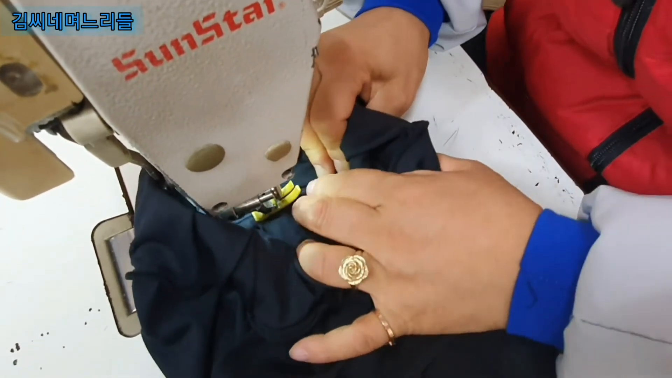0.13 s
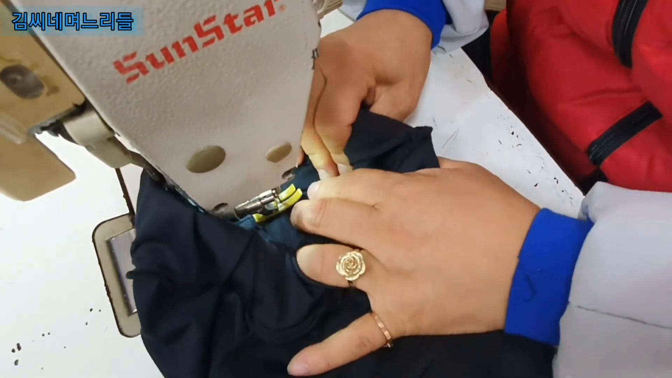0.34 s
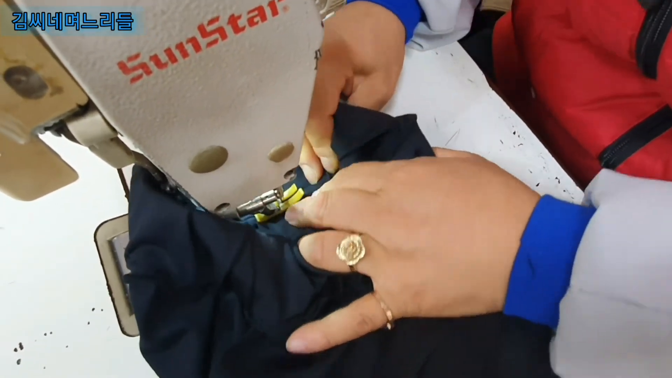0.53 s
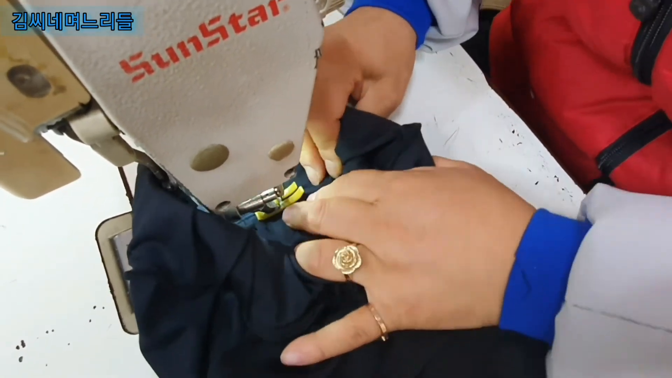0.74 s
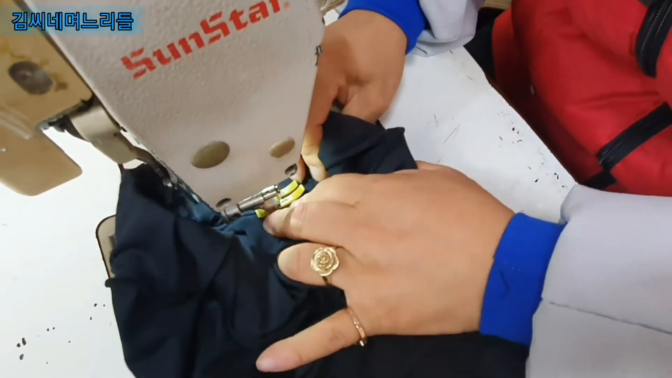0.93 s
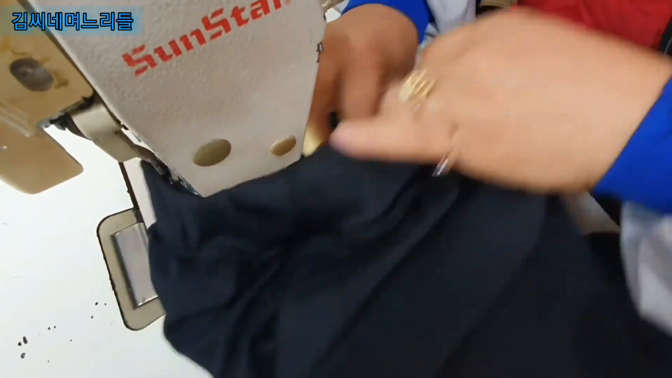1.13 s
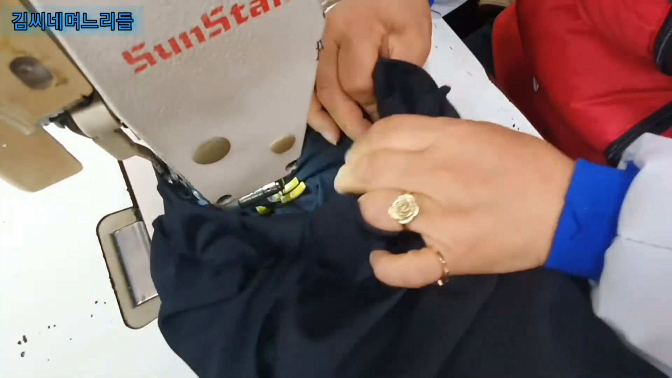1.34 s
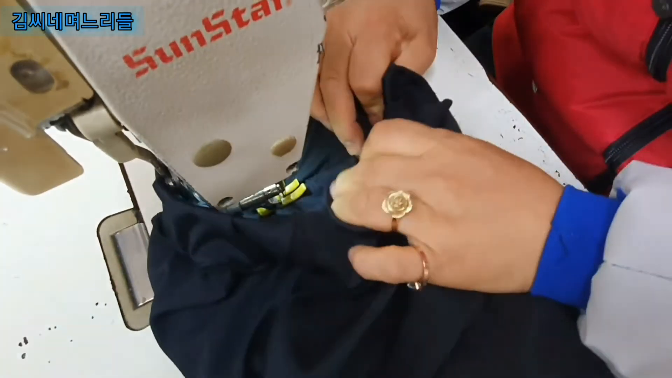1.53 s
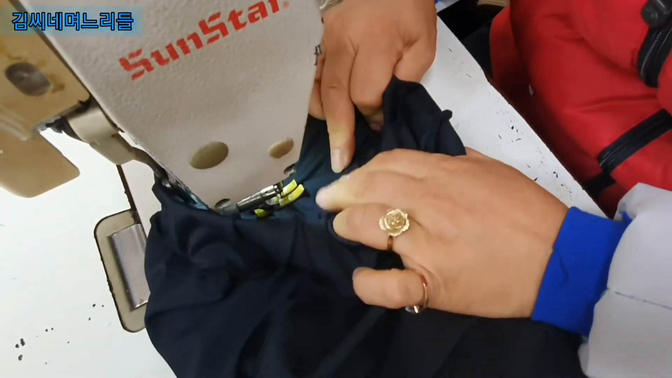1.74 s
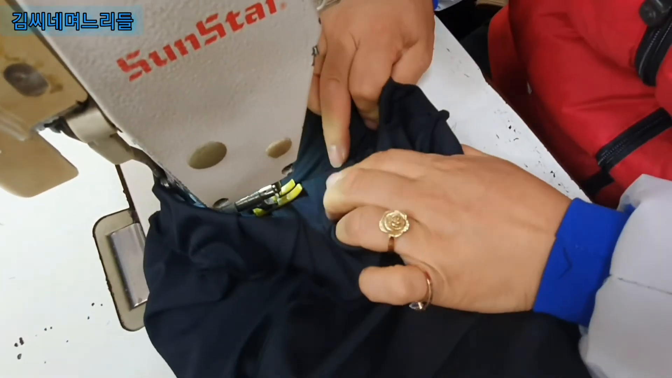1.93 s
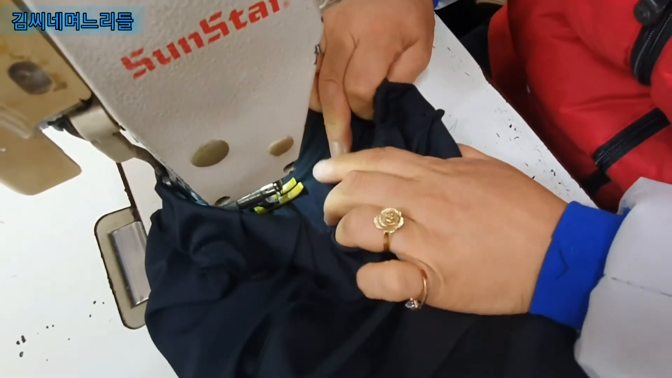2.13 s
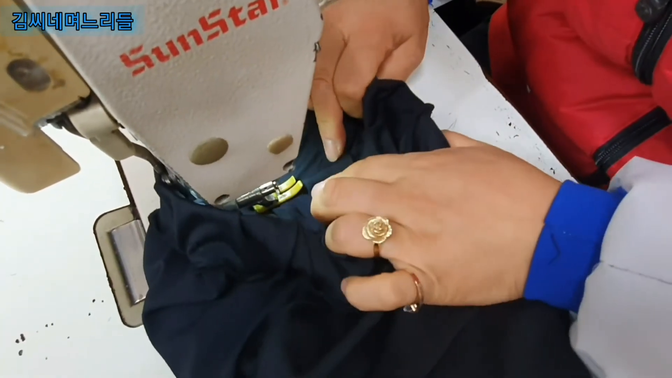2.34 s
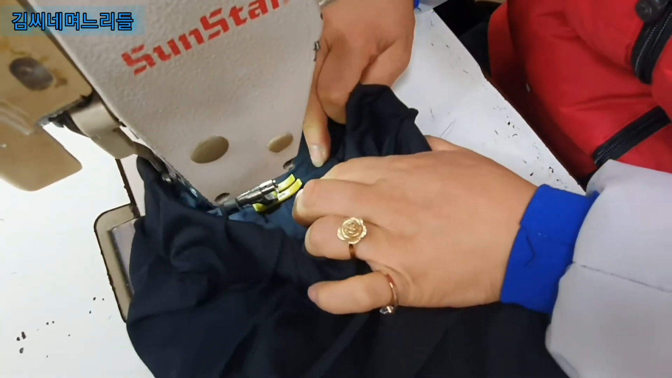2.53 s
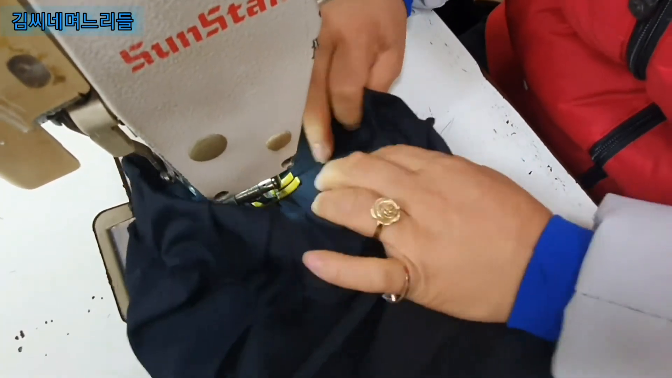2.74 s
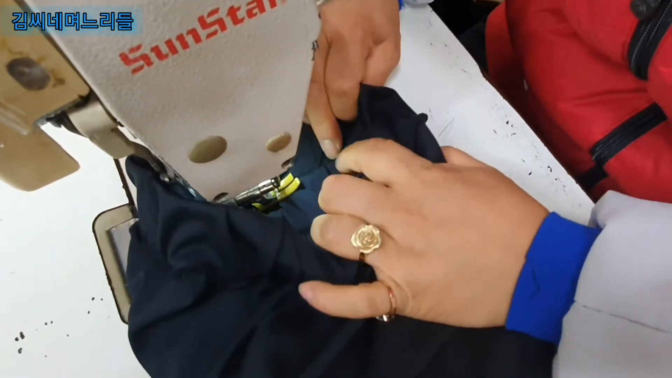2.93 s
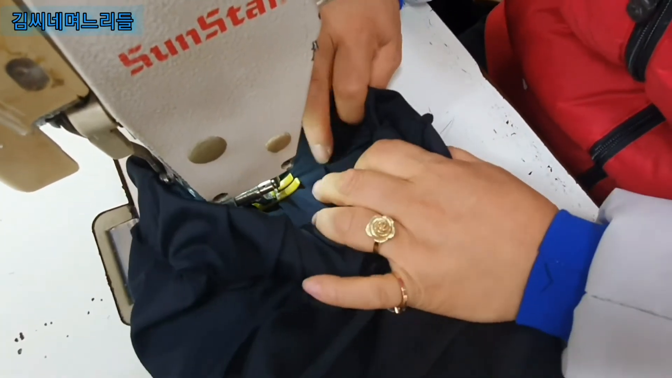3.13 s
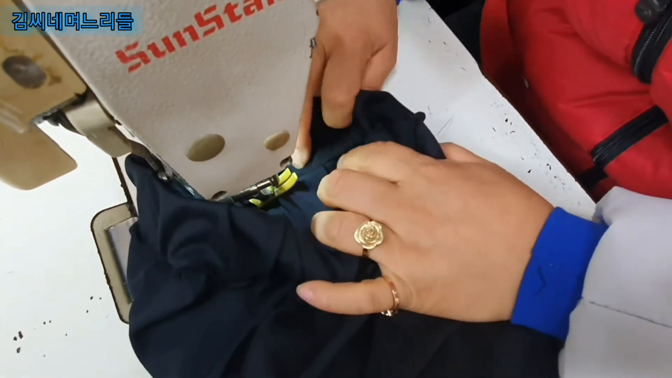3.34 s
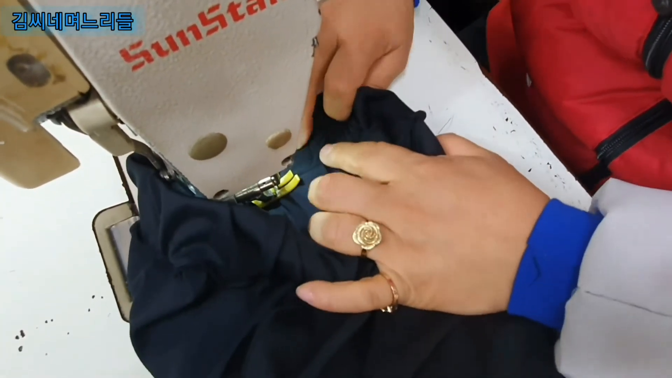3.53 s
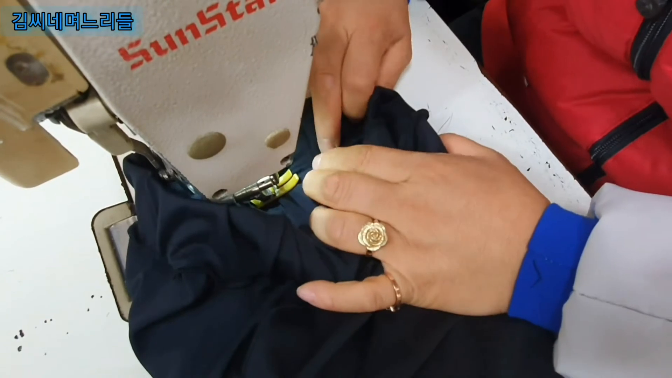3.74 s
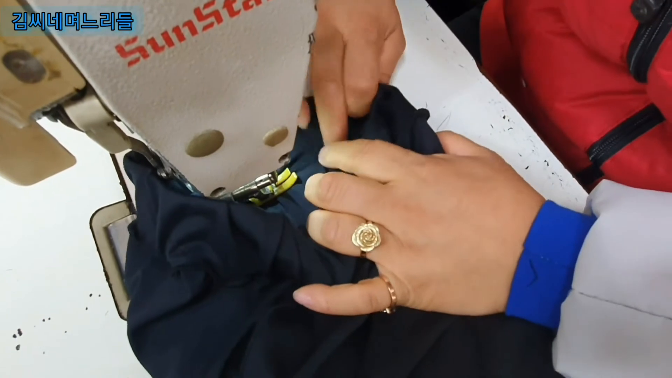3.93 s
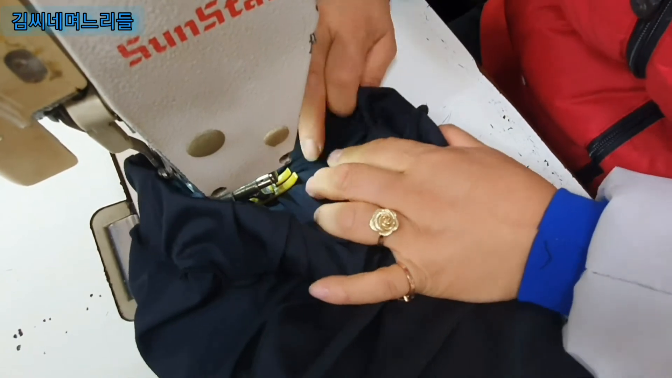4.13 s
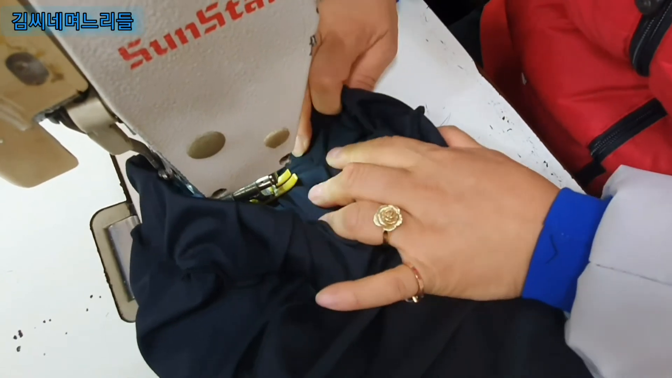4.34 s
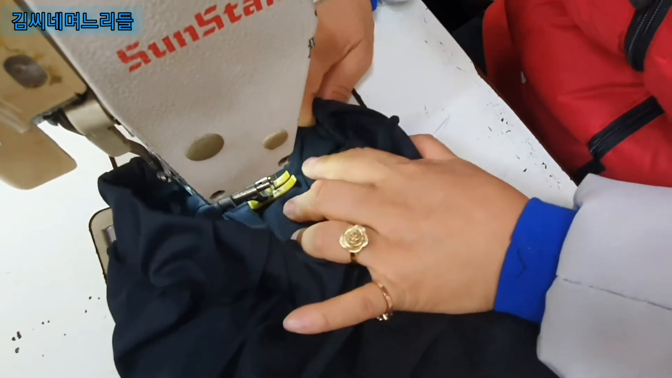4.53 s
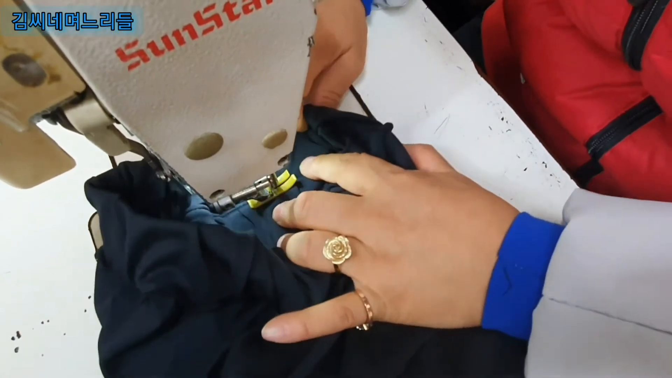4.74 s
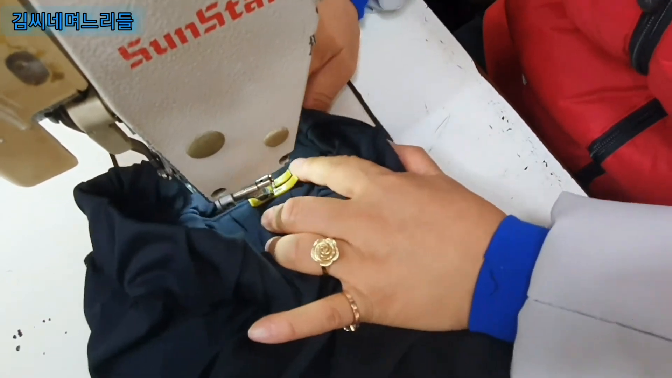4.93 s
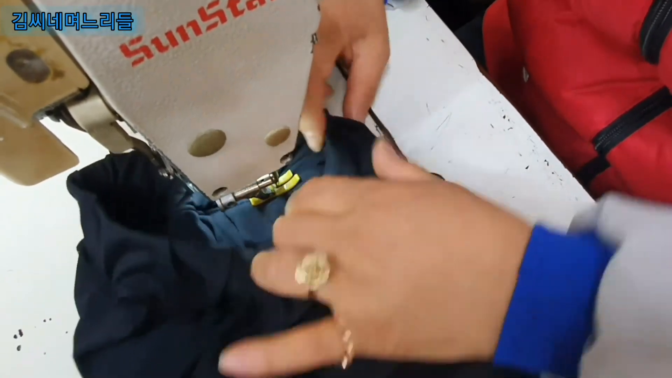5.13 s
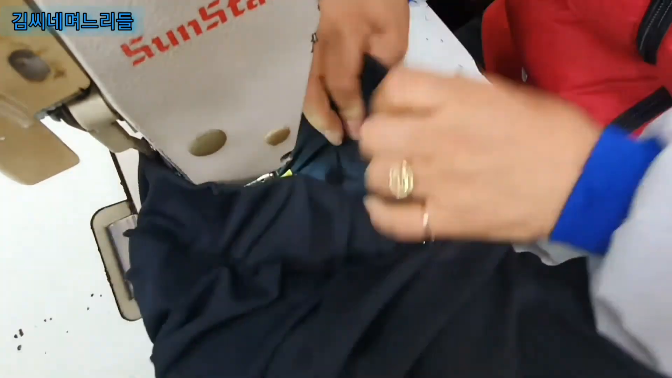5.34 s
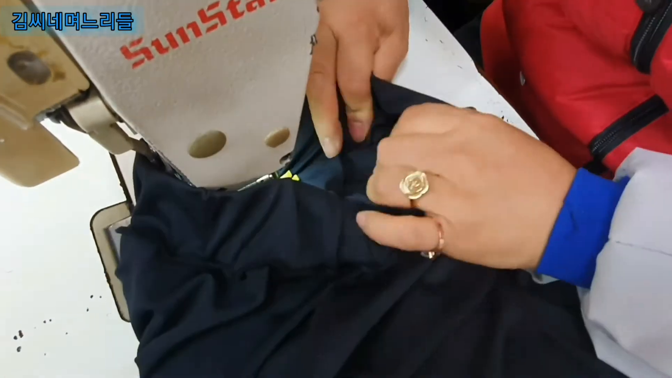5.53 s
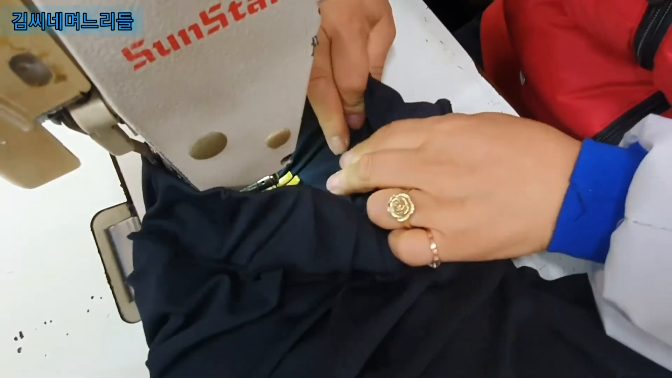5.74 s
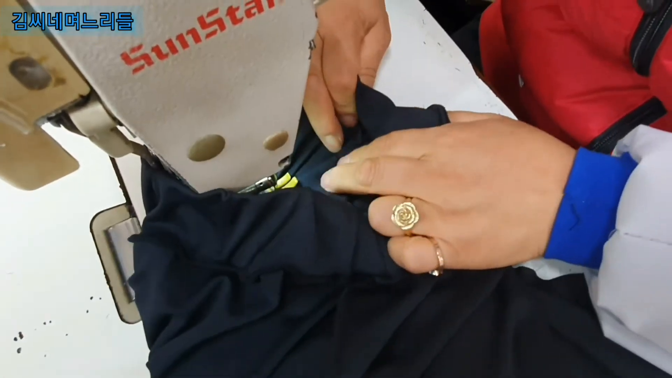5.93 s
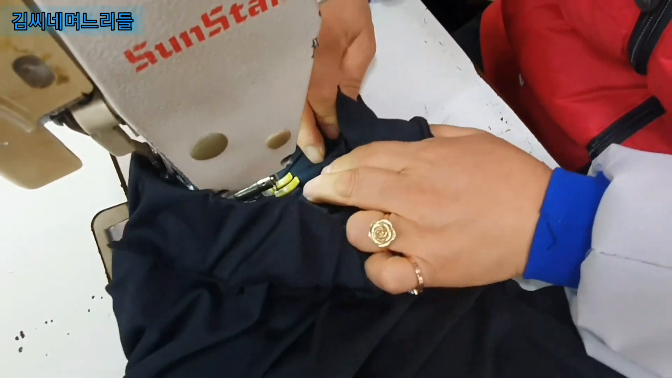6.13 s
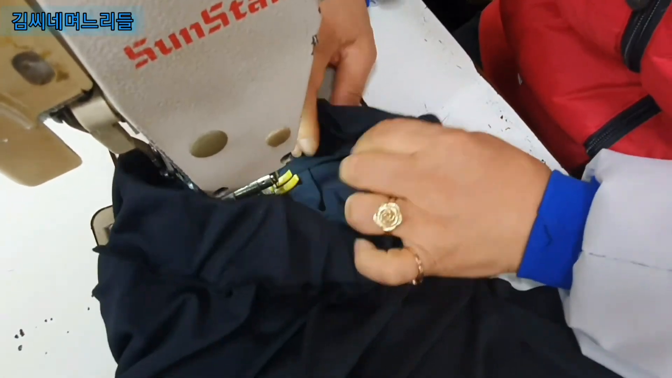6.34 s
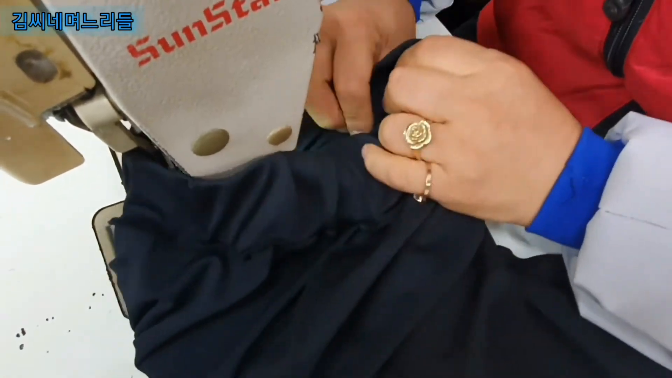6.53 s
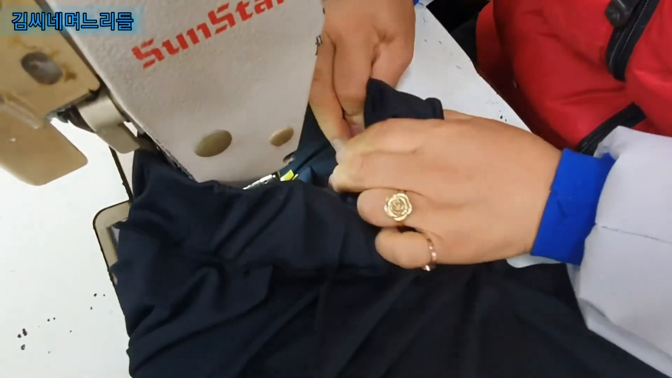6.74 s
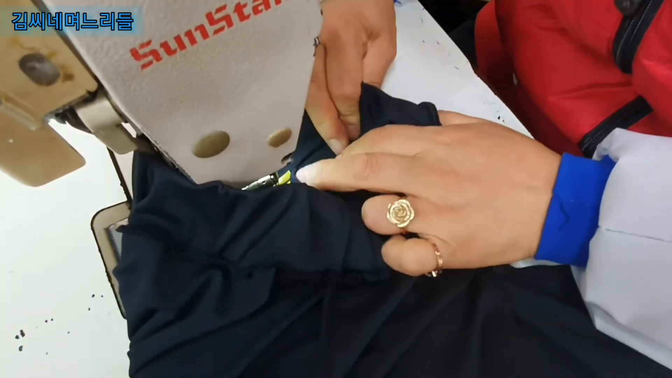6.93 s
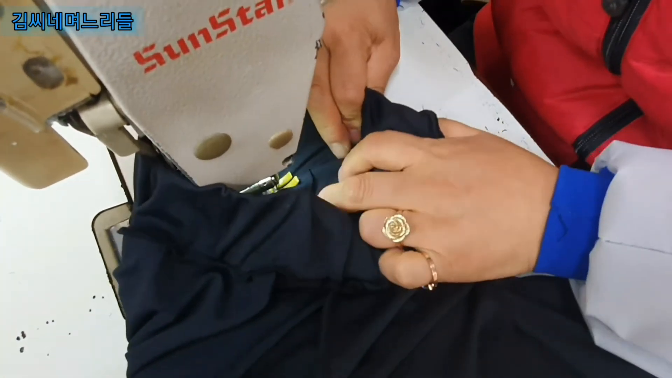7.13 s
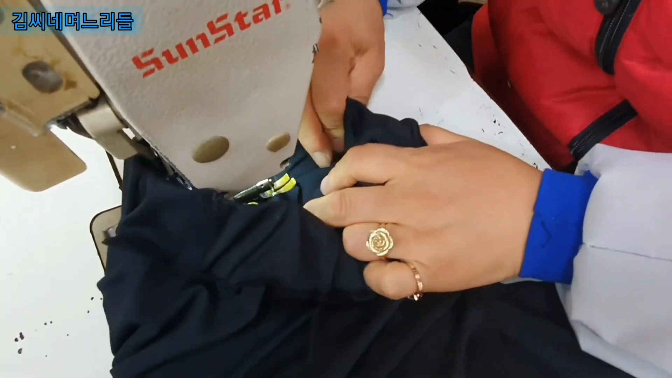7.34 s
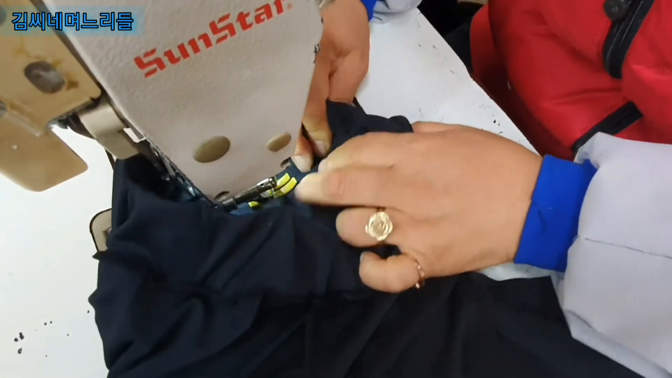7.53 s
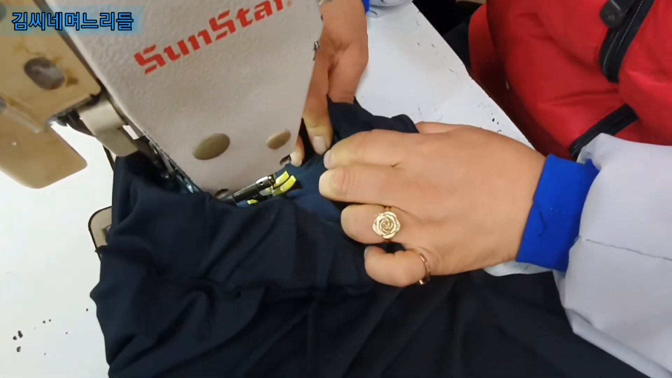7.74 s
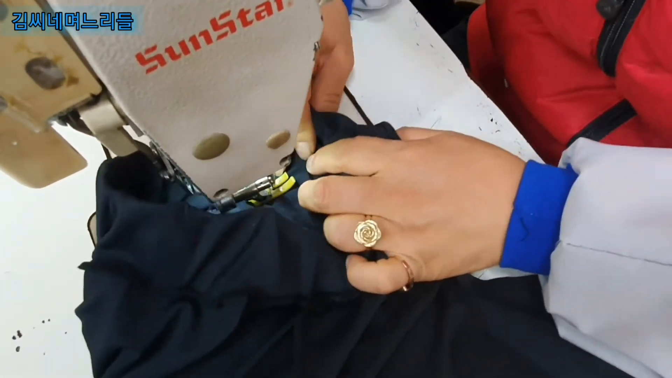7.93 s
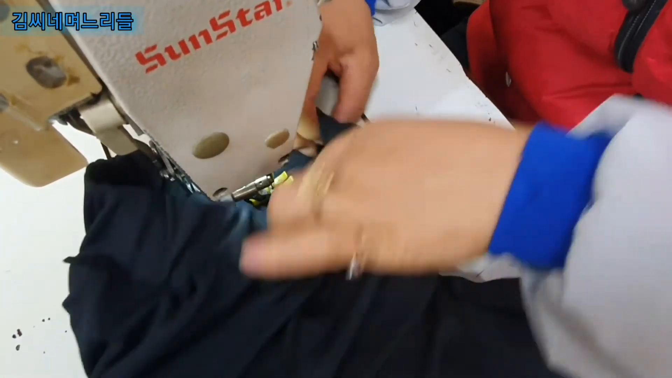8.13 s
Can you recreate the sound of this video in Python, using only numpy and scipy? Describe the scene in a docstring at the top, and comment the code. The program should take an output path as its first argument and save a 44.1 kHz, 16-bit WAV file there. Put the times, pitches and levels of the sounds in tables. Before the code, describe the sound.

A close, hand-held stereo phone hears an industrial sewing machine on a wooden-sounding table in a quiet workroom. In the first second it fires short bursts at about 0, 0.3 and 0.8 s: dense metallic clatter, needle knocks around fifty strokes a second, and a low table shudder sagging in pitch. Cloth slides from 1.1 s, with a soft pat and sharp finger taps on the phone near 1.4 and 1.7 s. A fuller run rattles from 2.3 to 2.7 s. Until 4.2 s there are only small motor groans, steel ticks, a soft bump and faint rustle over a dying low hum. Ragged bursts cluster from 4.35 to 5 s. Fabric sweeps and is patted from 5.2 to 5.8 s. Short runs follow at 6, 7.2 and 7.8 s, with rustling, a bump near 6.9 s and closing clacks.

```python
"""Dense steel clatter in short bursts: an industrial sewing machine, close to a hand-held phone.
The clatter is noise and small impacts, which also ring the steel head; decaying modes make the needle bar's knocks.
A sine of sagging pitch makes the table sway, and one slowly dying note is its stand ringing on after a run.
Short clacks and rattles fall mostly around the runs; the motor groans, steel ticks, fingers tap and pat.
Filtered noise slides the cloth over the table, above a low murmur of room air."""
import sys
import numpy as np
from scipy import signal
from scipy.fft import rfft, irfft, next_fast_len
from scipy.io import wavfile
from scipy.ndimage import uniform_filter1d, map_coordinates

SR = 44100
rng = np.random.default_rng(int(sys.argv[2]) if len(sys.argv) > 2 else 0)


def digitize_waveform(pressure):
    """Quantize a signal to 16-bit integers and store it at the path in sys.argv[1].

    Rows of a 2-D input are taken as channels; values are limited to [-1, 1].
    """
    field = np.atleast_2d(pressure).T
    bounded = np.clip(field, -1, 1)
    quanta = np.round(bounded * 32767).astype(np.int16)
    wavfile.write(sys.argv[1], SR, quanta)


N = 360727

STITCH_HZ = 50.28
# presses of the pedal: at_speed_s, held_s, spin_up_s, run_down_s,
# clatter_db, knocking_db, rocking_db, swell_while_held_db
PEDAL_PRESSES = [ (0.0, 0.1, 0.03, .08, -51, -55, -39.5, -7),
                 (0.32, 0.02, 0.052, 0.066, -27.5, -33, -23, 3),
                 (0.755, 0.024, 0.039, 0.095, -30, -25.5, -27.5, -1),
                 (0.895, 0.057, 0.072, 0.11, -40.5, -43, -39.5, -7.5),
                 (2.344, 0.25, 0.11, 0.15, -40.5, -31.5, -41.5, 9),
                 (4.359, 0.048, 0.038, 0.15, -34, -26.5, -31.5, -2.5),
                 (4.45, 0.094, .1, 0.12, -40.5, -34, -45.5, 3),
                 (4.662, .035, 0.077, 0.13, -40.5, -34.5, -38.5, -9.5),
                 (4.791, 0.036, 0.066, 0.059, -35.5, -37, -42.5, 3),
                 (4.849, 0.037, .05, .08, -49, -41, -34, 5.5),
                 (4.932, 0.028, 0.042, 0.19, -41.5, -37.5, -40, -9.5),
                 (5.95, 0.052, 0.063, 0.091, -35, -30.5, -38.5, 7.5),
                 (6.116, 0.033, 0.039, 0.094, -32, -34, -25.5, 1),
                 (7.211, 0.14, 0.071, 0.16, -36, -31.5, -30, 5.5),
                 (7.821, 0.033, 0.048, 0.093, -29, -25, -18, -0.5),
                 (8.018, 0.02, 0.13, 0.099, -51, -40, -42, 4)]
RAMP_DB = 30  # rise over a spin-up time, fall over a run-down time
RAMP_BEND = 1.15  # above 1, a ramp is gentle near full speed and steep near rest
BITE_S = 0.019  # onset of the knocking as the needle bites
KNOCK_LINGERS, ROCK_LINGERS = 0.79, 1.185  # their fades as multiples of the run-down time

# colour of the steel clatter: pitch_hz, relative density_db (dB per Hz)
STEEL_SPECTRUM = [(240, -13), (400, -10.5), (466, -15.5), (527, -13), (931, -23), (1230, -15), (1520, -18),
                  (1750, -17), (2380, -23.5), (2950, -16.5), (3600, -23.5), (7300, -36), (8640, -36.5),
                  (15700, -39.5)]
# modes of the steel head: pitch_hz, relative level_db, t60_s
HEAD_MODES = [(1244, 4, 0.045), (1721, -1.5, 0.083), (1747, 3.5, 0.039), (1910, 1, 0.032), (2067, -5, 0.05),
              (2560, -22, 0.046), (2578, 4, 0.058), (2684, 0, 0.024), (3150, -34, 0.062),
              (3070, -1.5, 0.037), (3300, -18, .06), (4000, -5.5, 0.021), (4520, -4, 0.029),
              (5090, -5.5, 0.024), (5730, -11.5, 0.076)]
# slow changes in the brightness of the clatter and clacks: start_s, treble_db
TREBLE_CURVE = [(0, 0.5), (.33, -2), (.85, 0), (2.5, 1.5), (4.4, 0.5), (4.9, -0.5), (6.1, 1.5), (7.3, 2.5),
                (7.9, 2)]

# hardest blows of the needle bar: start_s, peak level_db
HARD_BLOWS = [(0.077, -26.5), (0.332, -20.5), (0.37, -21.5), (0.749, -22.5), (0.789, -24), (0.897, -17),
              (2.346, -27.5), (2.422, -16), (2.511, -16.5), (2.539, -15), (2.562, -18.5), (2.582, -20),
              (2.609, -22), (3.211, -29.5), (4.366, -14), (4.419, -22), (4.481, -19), (4.519, -21.5),
              (4.66, -21), (4.79, -18.5), (4.932, -19), (5.948, -23), (6.179, -20.5), (7.202, -22.5),
              (7.228, -18.5), (7.34, -23), (7.804, -18.5), (7.83, -22.5)]
# modes of the table top: pitch_hz, relative level_db, t60_s
TABLE_MODES = [(115, -15.5, 0.036), (159, -3.5, 0.094), (209.6, 10, 0.037), (250.4, -5.5, 0.073),
               (303.5, -3.5, 0.055), (340, -10.5, 0.076), (383.7, -6, 0.074), (521, -13.5, 0.02)]
# the table rocking back once the machine has braked: start_s, fade_s, level_db (before the sway trim)
REBOUNDS_AFTER_BRAKING = [(.1, 0.26, -39), (.46, 0.17, -37), (.88, .15, -31), (1.005, 0.12, -40),
                          (2.697, 0.11, -33), (4.75, 0.15, -32.5), (4.875, 0.082, -30.5),
                          (5.0, 0.11, -35.5), (6.095, .12, -33), (6.235, 0.23, -36.5), (7.506, 0.18, -34.5),
                          (7.96, 0.26, -39.5)]
REBOUND_RISE_S = 0.094
# colour of the table's shudder: pitch_hz, relative density_db (dB per Hz)
SHUDDER_SPECTRUM = [(10, -17), (28, -1.5), (60, 4), (100, -0.5), (170, -28), (600, -120)]
# the stand set ringing by each run: start_s, rms level_db (before onset and waver)
STAND_RINGS = [(0, -48.5), (.34, -52), (.9, -47), (2.55, -47), (4.95, -59), (6.15, -48.5), (7.35, -57),
               (7.85, -58)]
LEAD_SAMPLES = 7  # the left microphone hears the table this much earlier

# motor groans inching the shaft: start_s, length_s, pitch_hz, level_db
MOTOR_NUDGES = [(0, 0.03, 149, -33.5), (.24, 0.034, 173, -38), (.53, 0.072, 161, -37.5),
                (2.24, 0.031, 146, -40), (3.195, .074, 173.6, -39), (3.27, 0.067, 185, -44.5),
                (3.365, 0.074, 191, -47), (3.425, 0.059, 162.4, -37.5), (3.615, 0.057, 158.3, -36.5),
                (3.644, 0.056, 165, -38), (4.14, 0.062, 162.5, -52), (4.265, 0.053, 162.3, -42.5),
                (5.875, 0.034, 174, -39.5), (7.11, 0.017, 158, -41), (7.74, 0.045, 177, -43.5)]
# colour of the motor's roughness: pitch_hz, relative density_db (dB per Hz)
GROAN_SPECTRUM = [(40, -1), (220, -4.5), (310, -1), (400, 0.5), (520, -32.5), (1500, -17), (5000, -58.5)]
# short clacks and rattles, mostly around the runs: start_s, level_db (before the clack trim)
SHORT_CLACKS = [(0.057, -28.5), (0.1242, -36.5), (0.2829, -24), (0.305, -16), (0.73, -24), (0.8863, -31),
                (2.2356, -36.5), (2.3314, -31), (2.739, -33.5), (3.196, -40), (3.981, -41), (4.35, -28),
                (4.3959, -21), (4.8818, -27), (4.9248, -27), (5.051, -36.5), (5.7177, -42), (6.113, -29),
                (6.2382, -43.5), (7.1507, -28.5), (7.202, -30), (7.4582, -30.5), (7.527, -31), (7.802, -24),
                (7.9443, -41), (8.028, -32.5), (8.0906, -32)]
# colour of a clack: pitch_hz, relative density_db (dB per Hz)
CLACK_SPECTRUM = [(300, 8), (800, -7), (1250, 2.5), (1800, 4), (2300, -3), (2900, 0), (4600, -2),
                  (9000, -25), (15000, -19)]
# fingers patting the cloth: start_s, level_db (before the pat trim)
CLOTH_PATS = [(1.319, -38.5), (5.254, -44), (5.352, -46.5), (5.43, -44), (5.721, -41.5), (5.791, -42.5)]
# colour of a pat: pitch_hz, relative density_db (dB per Hz)
PAT_SPECTRUM = [(80, -19), (220, 8), (450, -8), (800, 4), (1400, -0.5), (3000, -12), (8000, -31.5)]
# needle and ring ticking on steel: start_s, level_db and, relative to it, bright_ping_db (before trims)
STEEL_TICKS = [(0.078, -22, -11), (1.017, -38, -34), (2.2963, -28.5, -33), (3.2124, -25.5, -6),
               (3.653, -34.5, -5.5), (3.7711, -30, -18), (5.9132, -30.5, -32), (7.1128, -36, -31)]
# colour of a tick: pitch_hz, relative density_db (dB per Hz)
TICK_SPECTRUM = [(300, -15), (1200, 7.5), (2200, 4.5), (3000, 11.5), (4800, -2.5), (9000, -14),
                 (15000, -29)]
# finger taps on the phone: start_s, snap_db (before its low-pass), snap_upper_edge_hz, push_db
PHONE_TAPS = [(1.445, -13.5, 3980, -22), (1.730, -13.5, 1900, -25.5), (1.770, -20.5, 980, -21)]
# colour of a tap's snap: pitch_hz, relative level_db
SNAP_SPECTRUM = [(100, 8.5), (600, 13.5), (1300, 13.5), (2050, 8.5), (2400, 0), (3400, 4), (5500, -18),
                 (9000, -41)]
# soft bumps on the table: start_s, level_db
TABLE_BUMPS = [(3.023, -39.5), (6.906, -42), (6.946, -30)]

# hands sliding cloth over the table: start_s, fade_s, level_db (before the cloth trim)
CLOTH_SLIDES = [(.54, 0.19, -66.5), (1.09, 0.45, -60.5), (1.55, 0.12, -69.5), (2.2, .3, -74),
                (3.2, 0.85, -69.5), (3.982, 0.12, -74), (5.191, 0.51, -61.5), (5.458, 0.6, -73.5),
                (5.718, 0.72, -69), (6.35, 0.56, -71), (6.48, 0.46, -70.5), (6.677, 0.34, -66),
                (7.03, 0.5, -78), (7.701, 0.28, -85), (8.157, 0.32, -65.5)]
SLIDE_RISE_S, HELD_CLOTH_DB = 0.13, -76  # a slide's onset; rustle of merely held cloth, before the trim
# colour of the cloth: pitch_hz, relative density_db (dB per Hz)
RUSTLE_SPECTRUM = [(240, -4.5), (400, -9), (488, -9.5), (685, -2), (975, -10), (1190, -1.5), (1410, -5.5),
                   (2990, -9), (9480, -30.5), (11200, -25), (15700, -34)]
# colour of the room air: pitch_hz, relative density_db (dB per Hz)
ROOM_SPECTRUM = [(25, -20), (55, 9), (100, 1.5), (160, -5), (230, 8), (320, -11.5), (430, -16.5),
                 (620, -11), (900, -39), (2000, -30), (5000, -80)]

# how alike the two microphones hear a sound: pitch_hz, likeness (correlation, no unit)
STEREO_LIKENESS = [(300, 0.77), (640, .5), (1400, -0.16), (3000, 0.09), (7000, 0)]
# how far a sound leans to one side: pitch_hz, left_minus_right_db
STEREO_LEAN = [(400, -1), (1300, -0.5), (2400, -5), (4400, 3.5), (6000, 12), (7500, 14), (10000, 5),
               (15000, 8)]
TOP_HZ = 15850  # the phone's band limit


def gesture(s, held, rise, fall, db, swell_db=0):
    """Gain that ramps up until s, is held with a swell in level, and ramps down."""
    t = np.arange(N) / SR - s
    ramps = np.maximum(-t / max(rise, 1e-3), (t - held) / max(fall, 1e-3)).clip(0, 10)
    swell = swell_db * (np.clip(t / max(held, 1e-3), 0, 1) - .5)
    return amp(db + swell - RAMP_DB * ramps ** RAMP_BEND)


def pedal():
    """Each press spins the machine up, holds it and lets it run down: gains of clatter, knocking, rocking."""
    drive = np.zeros((3, N))
    for s, held, rise, fall, clatter_db, knock_db, rock_db, swell_db in PEDAL_PRESSES:
        press = [gesture(s, held, rise, fall, clatter_db, swell_db),
                 gesture(s, held, BITE_S, fall * KNOCK_LINGERS, knock_db, swell_db),
                 gesture(s, held, rise, fall * ROCK_LINGERS, rock_db, swell_db)]
        drive = np.maximum(drive, press)  # the stronger press wins where two overlap
    return drive


def clatter(turns, effort, depth_db=-0.5, grain=0.69, uneven_db=2.07, clatter_db=2, ring_db=-4):
    """Hook, feed dog and linkages rattle densely and unevenly, and strike the modes of the head."""
    # only a slight ripple follows the shaft
    ripple_db = depth_db * (np.cos(2 * np.pi * turns) + np.cos(4 * np.pi * turns))
    drive = effort * unit(amp(ripple_db + uneven_db * wobble(110)))
    rattle = rng.standard_normal((2, N)) + grain * contacts(700)
    # different parts touch, so the colour keeps shifting
    rattle = patchy(rattle, depth_db=2.6)
    hits = contacts(250)
    ring = np.zeros((2, N))
    for hz, db, t60 in HEAD_MODES:
        # the same contacts, moved by a random time for each mode
        moved_hits = np.roll(hits, rng.integers(N), axis=1)
        ring += amp(db) * struck(moved_hits * drive, hz, t60)
    ring /= np.linalg.norm(amp(np.array(HEAD_MODES)[:, 1]))
    return spread(amp(clatter_db) * coloured(rattle * drive, STEEL_SPECTRUM) + amp(ring_db) * ring)


def patchy(x, depth_db):
    """Random gains over patches about 20 ms long and 700 Hz wide, shared by both channels."""
    z = signal.stft(x, nperseg=256)[2]
    field = rng.standard_normal(z.shape[1:])
    field = uniform_filter1d(field, size=4, axis=0)
    field = uniform_filter1d(field, size=7, axis=1)
    return unit(signal.istft(z * amp(depth_db * unit(field)), nperseg=256)[1][:, :N])


def brightened(x, edge_hz=4200):
    """The treble rises and dips along a slow curve."""
    treble = filtered(x, lambda hz: hz ** 4 / (hz ** 4 + edge_hz ** 4))
    treble_gain = amp(np.interp(np.arange(N) / SR, *np.transpose(TREBLE_CURVE)))
    return x + treble * (treble_gain - 1)


def needle(turns, rattle, force, return_db=-6, knock_db=7, blow_db=0, ping_db=-6, ping_hz=7280):
    """The needle bar knocks the table at both ends of its stroke; the needle pings on the plate."""
    t, out = clock(.12), np.zeros(N)
    ping = decay(t, 0.0081) * np.sin(2 * np.pi * ping_hz * t)
    strokes = np.flatnonzero(np.diff(np.floor(2 * turns)))
    chances = rng.standard_normal((len(strokes), 3))
    for k, (at, (late, weight, glance)) in enumerate(zip(strokes, chances)):
        add(out, at / SR, rattle[at] * amp(ping_db + 1.5 * min(glance, 2)) * ping)
        # a hard blow takes the place of the ordinary strokes around it
        if np.abs(np.array(HARD_BLOWS)[:, 0] - at / SR).min() > .5 / STITCH_HZ:
            # the upstroke is the lighter one
            stroke_db = knock_db + return_db * (k % 2) + 2.9 * weight
            add(out, at / SR + 0.00062 * late, force[at] * amp(stroke_db) * knock(t))
    for s, db in HARD_BLOWS:
        add(out, s, amp(db + blow_db) * knock(t))
    return out


def knock(t):
    """One blow on the table top, swelling for about a cycle, every mode at a new strength, peak 1."""
    extra_db = rng.normal(0, 3.5, len(TABLE_MODES))
    ring = np.zeros(len(t))
    for (hz, db, t60), extra in zip(TABLE_MODES, extra_db):
        ring += amp(db + extra) * decay(t, t60) * np.sin(2 * np.pi * hz * t)
    ring = ring * (1 - np.exp(-t / 0.0042))
    return ring / np.abs(ring).max()


def sway(rocking, rest_hz=59, soft_hz=41.45, give_db=-27, shudder=0.42, sway_db=-1):
    """The table rocks on rubber feet, which soften and lower its pitch in a big swing."""
    rebounds = [gesture(s, 0, REBOUND_RISE_S, fall, db) for s, fall, db in REBOUNDS_AFTER_BRAKING]
    swing = np.max([rocking] + rebounds, axis=0)
    pitch_hz = rest_hz + (soft_hz - rest_hz) * np.tanh(swing / amp(give_db))
    tone = np.sin(2 * np.pi * np.cumsum(pitch_hz) / SR)
    rumble = unit(filtered(rng.standard_normal(N), lambda hz: amp(along(SHUDDER_SPECTRUM, hz))))
    return amp(sway_db) * swing * unit(tone + shudder * rumble)


def stand(ring_hz=204.2, t60=2.18, waver_db=0.9):
    """The steel stand hums on one wavering note and dies away slowly after each run."""
    t, envelope = clock(2), np.zeros(N)
    for s, db in STAND_RINGS:
        add(envelope, s, amp(db) * decay(t, t60) * (1 - np.exp(-t / .01)))
    tone = np.sqrt(2) * np.sin(2 * np.pi * ring_hz * np.arange(N) / SR)  # rms 1
    return envelope * amp(waver_db * wobble(15)) * tone


def motor(rough=0.12, buzz_db=-13):
    """Short groans as the servo turns the shaft by a fraction: a sine with noise in its phase and on top."""
    out = np.zeros(N)
    buzz = unit(filtered(rng.standard_normal(N), lambda hz: amp(along(GROAN_SPECTRUM, hz))))
    for s, length, hz, db in MOTOR_NUDGES:
        t = clock(length)
        grit = buzz[max(round(s * SR), 0):][:len(t)]
        groan = np.sin(2 * np.pi * hz * t + rough * grit) + amp(buzz_db) * grit
        add(out, s, amp(db) * np.sin(np.pi * t / length) * groan)
    return out


def clacks(clack_db=-10, t60=0.062, attack=0.0014, pat_db=-9, pat_t60=0.071, pat_attack=0.00072):
    """Short clacks and rattles, and fingers landing dully on the cloth: decaying puffs of coloured noise."""
    t, rattles, pats = clock(.12), np.zeros((2, N)), np.zeros((2, N))

    def puff(t60, attack):
        return decay(t, t60) * (1 - np.exp(-t / attack)) * rng.standard_normal((2, len(t)))

    for s, db in SHORT_CLACKS:
        add(rattles, s, amp(db + clack_db) * puff(t60, attack))
    for s, db in CLOTH_PATS:
        add(pats, s, amp(db + pat_db) * puff(pat_t60, pat_attack))
    return spread(coloured(rattles, CLACK_SPECTRUM) + coloured(pats, PAT_SPECTRUM))


def ticks(tick_db=-9, scrape_db=-11, tick_t60=0.034, ping_db=-3, ping_hz=7500):
    """Steel scrapes briefly, then catches with a crack and a bright, fuzzy ping."""
    t, cracks, pings = clock(.04), np.zeros((2, N)), np.zeros((2, N))

    def burst(t60):
        return decay(t, t60) * rng.standard_normal((2, len(t)))

    for s, db, bright_db in STEEL_TICKS:
        # the scrape is a burst turned backwards, so it grows into the crack
        add(cracks, s - len(t) / SR, amp(db + scrape_db) * burst(0.018)[:, ::-1])
        add(cracks, s, amp(db) * burst(tick_t60))
        add(pings, s, amp(db + bright_db + ping_db) * burst(0.024))
    return amp(tick_db) * spread(coloured(cracks, TICK_SPECTRUM)) + struck(pings, ping_hz, t60=0.0039)


def handling(push_hz=68, bump_hz=72, far_db=-26):
    """Finger taps snap and push the air at the right microphone; bumps thud through the table."""
    t, taps, bumps = clock(.12), np.zeros(N), np.zeros(N)

    def thud(hz, t60):
        return -2 * np.sin(2 * np.pi * hz * t) * decay(t, t60) * (1 - np.exp(-t / 0.0091))

    for s, snap_db, edge_hz, push_db in PHONE_TAPS:
        snap = signal.lfilter(*signal.butter(2, edge_hz, fs=SR), impulse(SNAP_SPECTRUM))
        add(taps, s, amp(snap_db) * snap)
        add(taps, s + 0.0014, amp(push_db) * thud(push_hz, 0.048))
    for s, db in TABLE_BUMPS:
        add(bumps, s, amp(db) * thud(bump_hz, 0.054))
    return taps * amp([[far_db], [0]]) + bumps


def workshop(cloth_db=7.5, grain=0.38, room_db=-68):
    """Cloth rustles unevenly under the hands, over the low murmur of the room's air."""
    fibres = rng.standard_normal((2, N)) + grain * contacts(250)
    fibres = unit(fibres * amp(1.5 * wobble(120)))
    slides = sum(gesture(s, 0, SLIDE_RISE_S, fall, db) ** 2 for s, fall, db in CLOTH_SLIDES)
    stroke = np.sqrt(amp(HELD_CLOTH_DB) ** 2 + slides) * amp(wobble(25))
    cloth = spread(coloured(fibres, RUSTLE_SPECTRUM)) * stroke * amp(cloth_db)
    air = filtered(rng.standard_normal((2, N)), lambda hz: amp(along(ROOM_SPECTRUM, hz)))
    return cloth + unit(spread(air)) * amp(room_db + 0.87 * wobble(3.46))


def amp(db):
    """Decibels to gain."""
    return 10 ** (np.asarray(db) / 20)


def unit(x):
    """Scaled to rms 1."""
    return x / np.sqrt(np.mean(x ** 2) + 1e-20)


def along(points, hz):
    """(Hz, value) points read on a log axis."""
    f, v = np.transpose(points)
    return np.interp(np.log(hz + 1), np.log(f + 1), v)


def clock(seconds):
    """Sample times of a stretch."""
    return np.arange(int(seconds * SR)) / SR


def wobble(rate):
    """A smooth random curve, rate knots a second."""
    knots = rng.standard_normal(int(N * rate / SR) + 4)
    return map_coordinates(knots, [np.arange(N) * rate / SR])


def contacts(rate):
    """Small random impacts at rate a second, rms 1, for two microphones."""
    return unit((rng.random((2, N)) < rate / SR) * rng.standard_normal((2, N)))


def decay(t, t60):
    """Falls by 60 dB in t60."""
    return np.exp(-np.log(1000) * t / max(t60, 1e-3))


def struck(x, hz, t60):
    """x rung through one mode, a resonator scaled to keep the energy."""
    radius = decay(1 / SR, t60)
    gain = np.sqrt((1 - radius ** 2) / 2)
    return signal.lfilter([gain, 0, -gain], [1, -2 * radius * np.cos(2 * np.pi * hz / SR), radius ** 2], x)


def filtered(x, gain):
    """x times a gain that depends on frequency."""
    m = next_fast_len(N + SR // 2)
    return irfft(rfft(x, m) * gain(np.fft.rfftfreq(m, 1 / SR)), m)[..., :N]


def impulse(spectrum):
    """The causal click that has this spectrum, peak 1."""
    size = 2048
    # folding the cepstrum forward in time gives minimum phase
    cepstrum = irfft(np.log(amp(along(spectrum, np.fft.rfftfreq(size, 1 / SR)))))
    click = irfft(np.exp(rfft(2 * cepstrum[:size // 2], size)))
    return click / np.abs(click).max()


def coloured(x, spectrum):
    """Both channels through the causal filter of a spectrum, scaled to unit energy."""
    body = impulse(spectrum)
    return signal.fftconvolve(x, body[None] / np.linalg.norm(body), axes=1)[:, :N]


def add(track, s, sound):
    """Mixes a sound into the track at time s."""
    room = track[..., max(round(s * SR), 0):]
    room[..., :sound.shape[-1]] += sound[..., :room.shape[-1]]


def spread(pair):
    """Two unrelated signals become what the two microphones hear."""
    def mid_side_gains(hz):
        turn = np.arccos(np.clip(along(STEREO_LIKENESS, hz), -1, 1)) / 2
        return np.array([np.cos(turn), np.sin(turn)])

    mid, side = filtered(pair, mid_side_gains)
    halves = np.array([[.5], [-.5]])  # each side takes half of the level difference
    return filtered(np.array([mid + side, mid - side]), lambda hz: amp(along(STEREO_LEAN, hz) * halves))


def scene():
    """One shaft, its speed wandering slightly at random, times the clatter's ripple and the knocks."""
    turns = np.cumsum(STITCH_HZ * (1 + 0.02486 * wobble(8))) / SR
    rattle, force, rocking = pedal()
    table = needle(turns, rattle, force) + sway(rocking) + stand() + motor()
    # the table's sound reaches the left microphone a little earlier
    table = np.array([table, np.pad(table, (LEAD_SAMPLES, 0))[:N]])
    return table + brightened(clatter(turns, rattle) + clacks()) + ticks() + handling() + workshop()


def record(dry):
    """The phone keeps nothing above its band limit, which fades out over 300 Hz."""
    return filtered(dry, lambda hz: np.clip((TOP_HZ - hz) / 300 + .5, 0, 1) ** 2)


dry = scene()
out = record(dry)
digitize_waveform(out)
```